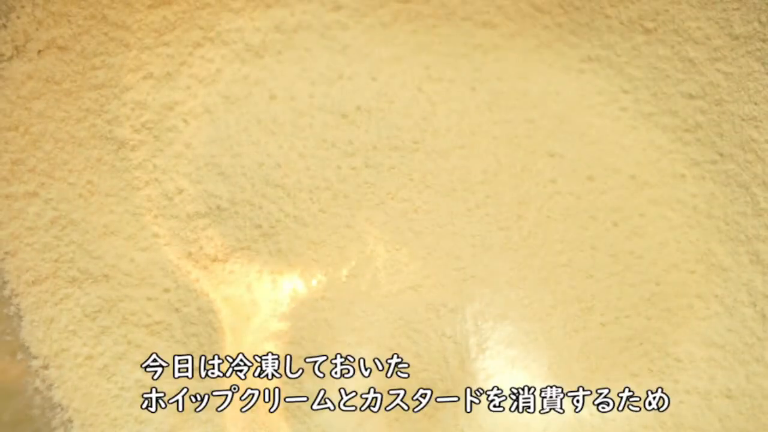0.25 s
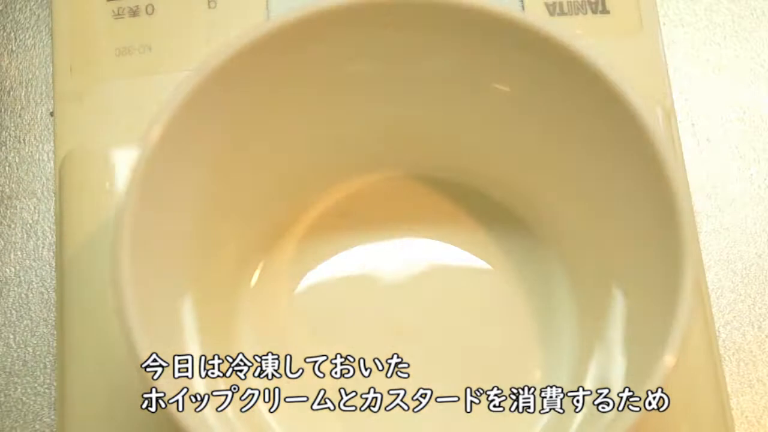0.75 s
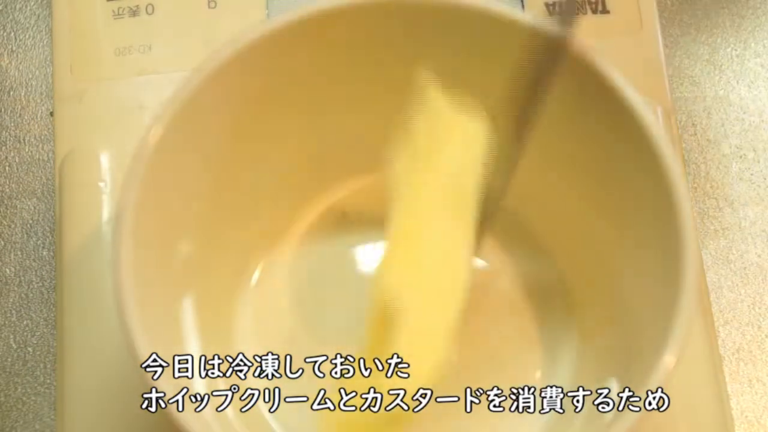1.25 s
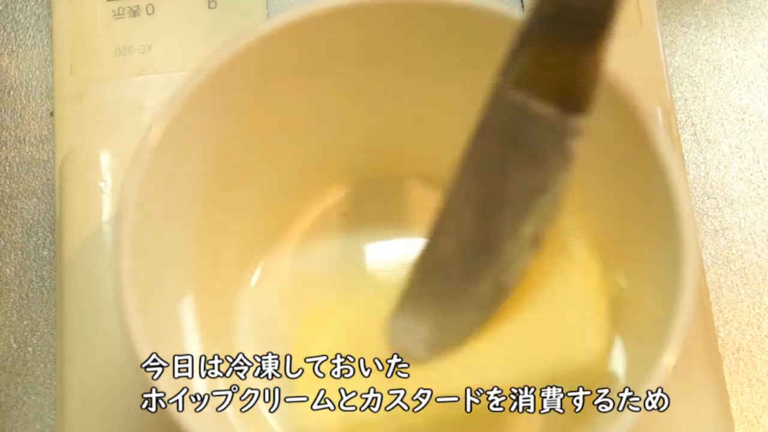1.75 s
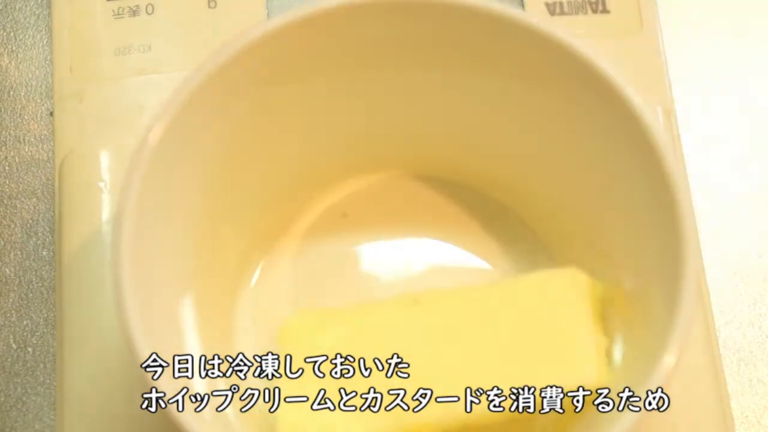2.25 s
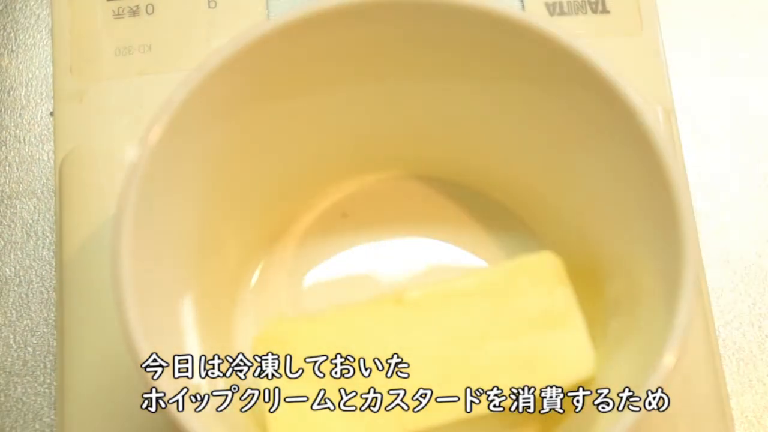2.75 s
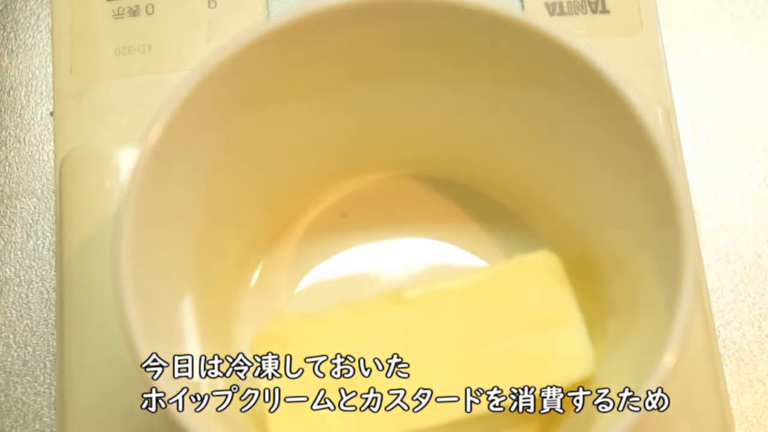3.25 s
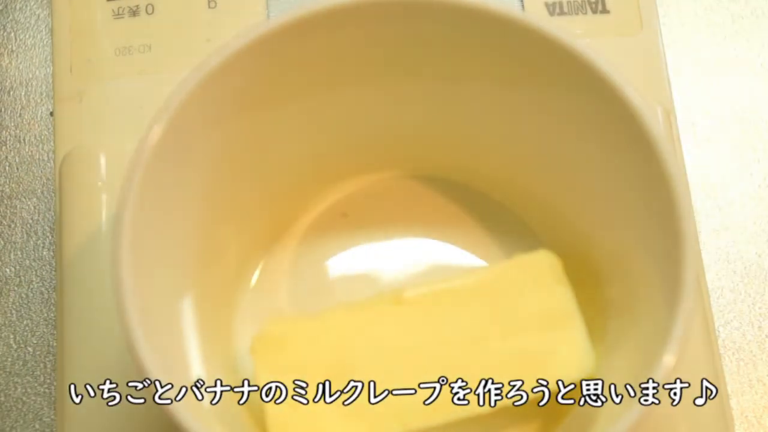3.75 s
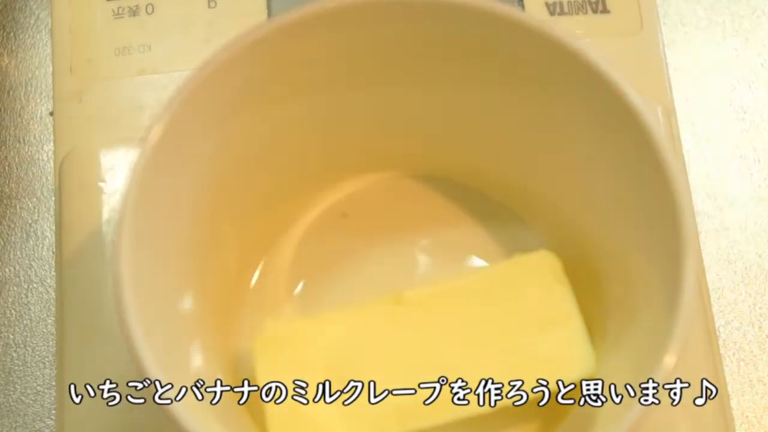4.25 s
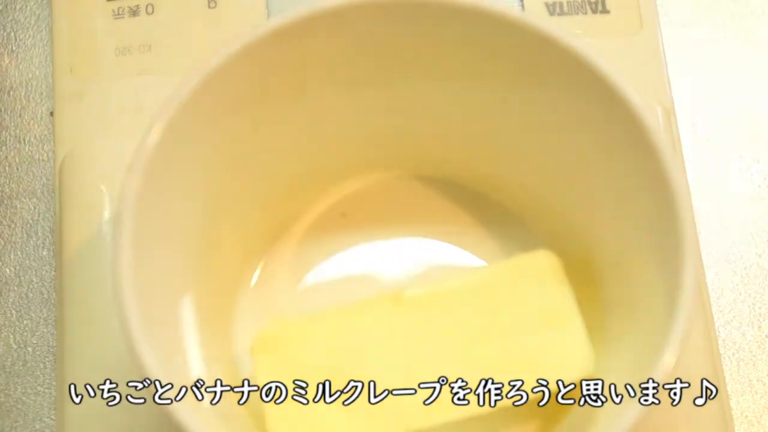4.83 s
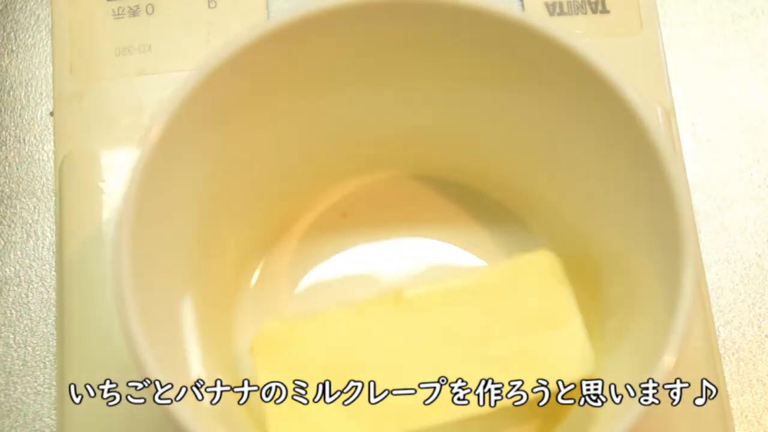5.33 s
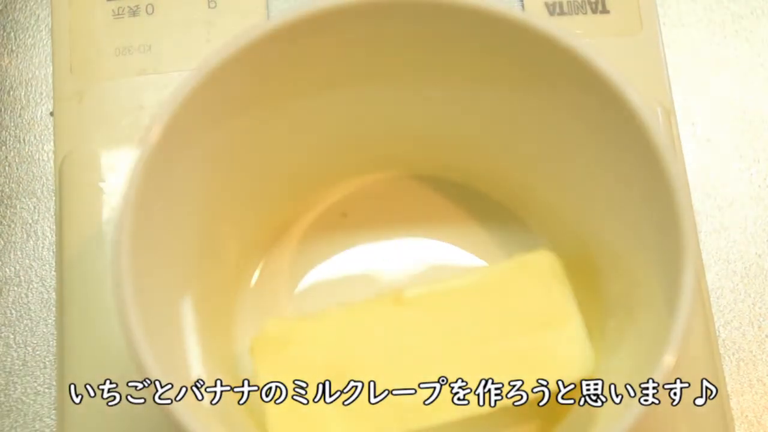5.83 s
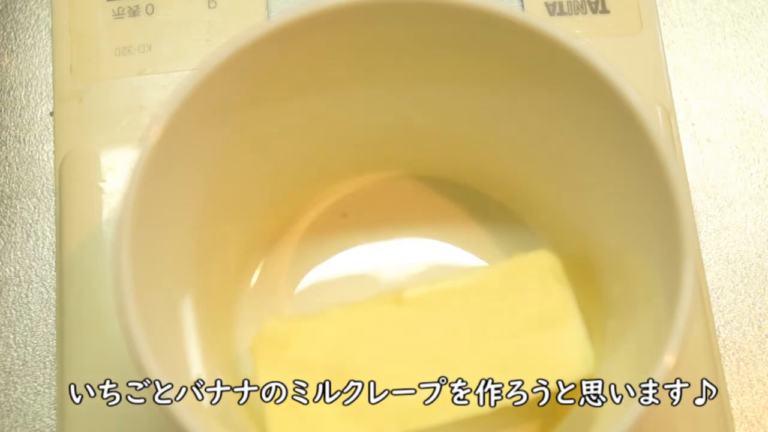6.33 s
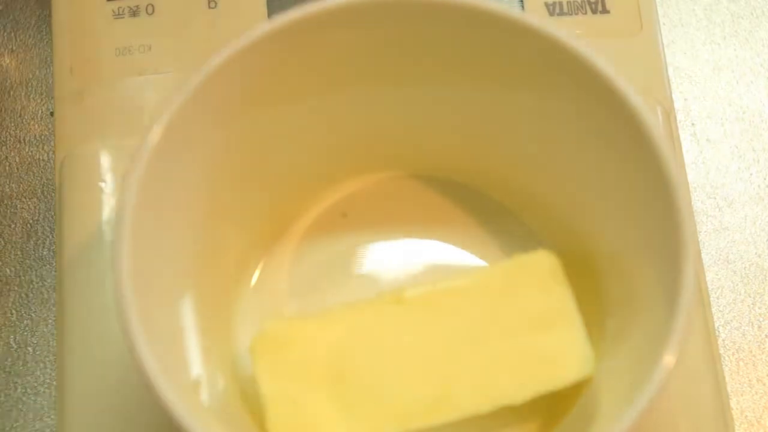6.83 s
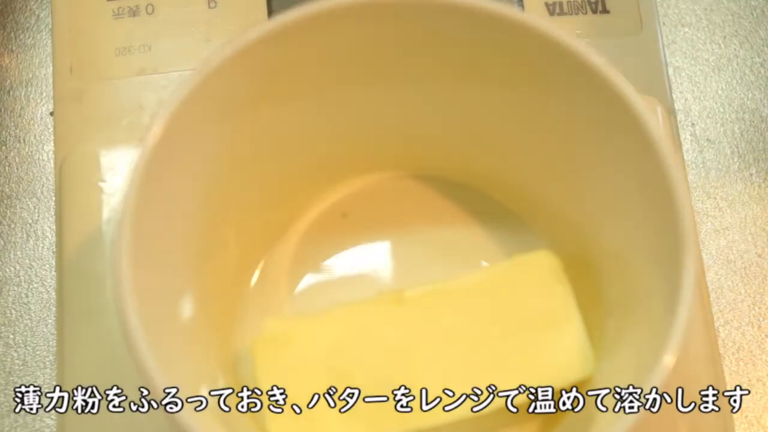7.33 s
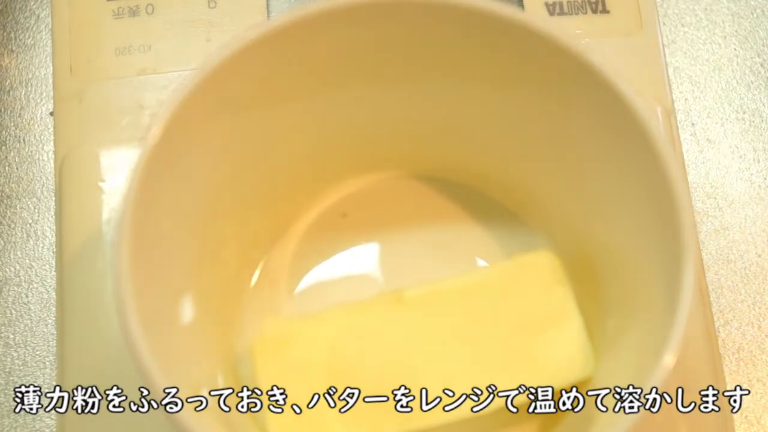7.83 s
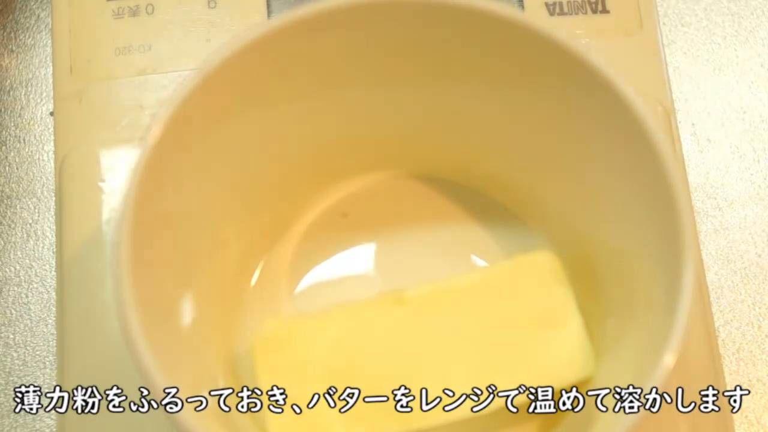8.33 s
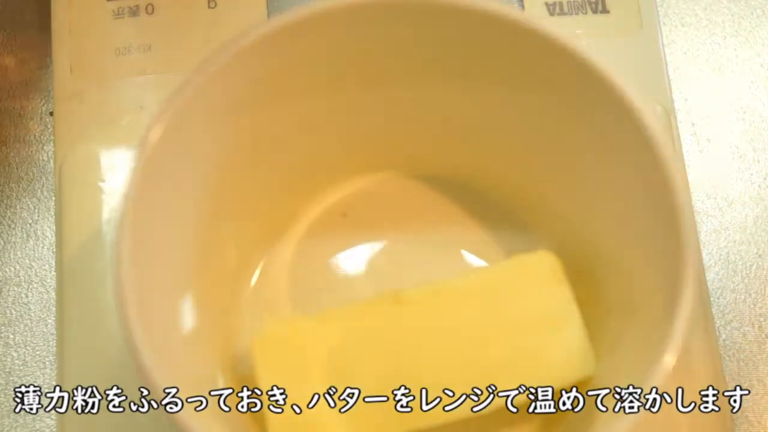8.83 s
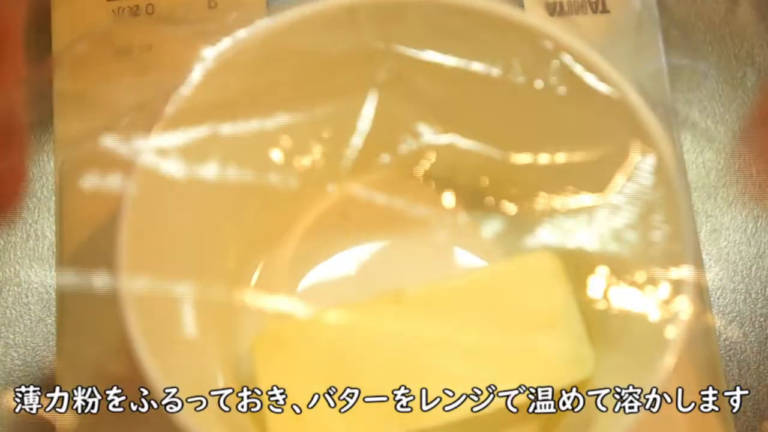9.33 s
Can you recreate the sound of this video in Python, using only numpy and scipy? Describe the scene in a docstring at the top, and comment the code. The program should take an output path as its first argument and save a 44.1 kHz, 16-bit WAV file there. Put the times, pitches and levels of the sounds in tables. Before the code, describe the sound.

Right at the start a dish slides briefly and lands with a ringing clatter, to the right of the close microphone. A soft dull knock follows at 0.6 seconds, and at about 1.3 seconds a steel knife clinks twice on a ceramic bowl. From about 2.5 seconds hands rummage softly, with cardboard rubbing and light knocks, and something hard is put down with a short ring at 3.3 seconds. From 6.2 seconds cling film is pulled from its box in crackling jerks, growing louder, with sharp snaps and low bumps on the worktop. Around 8 seconds it rips off in three quick tugs. The hollow cardboard box drops at 8.5 seconds, slightly right, and a few faint ticks of film follow until about 9.3 seconds. The small kitchen has a very short echo, and a faint appliance hum and hiss continue throughout.

```python
"""Cling film in a quiet kitchen

Close to the microphone, a dish slides and is set down, and a steel knife clinks on a ceramic bowl;
both ring in their own modes. Hands rummage for a cardboard box of cling film, pull the film out in
crackling jerks made of tiny slips, rip it off and drop the hollow box. The small room answers
briefly, and a faint appliance hums in the hiss behind."""
import sys
import numpy as np
from scipy import signal
from scipy.fft import rfft, irfft, next_fast_len
from scipy.io import wavfile
from scipy.ndimage import uniform_filter1d, map_coordinates

SR = 44100
rng = np.random.default_rng(int(sys.argv[2]) if len(sys.argv) > 2 else 0)


def unload_wav(signal):
    """Save mono or channel-first audio to the path in sys.argv[1] as 16-bit WAV at rate SR, clipped to [-1, 1]."""
    wavfile.write(
        sys.argv[1],
        SR,
        np.round(np.clip(np.atleast_2d(signal).T, -1, 1) * 32767).astype(np.int16),
    )


N = 422037

# where the hands are in front of the microphone: time_s, left_over_right_db
HAND_PAN = [(0, -12), (.5, -1.5), (6.6, -1.6), (7.1, -5), (8.6, -9), (9, -1)]
# resonances of the cardboard box: centre_hz, width_hz, level_db
BOX_RESONANCES = [(560, 55, 6), (1120, 55, 2), (1320, 80, 4), (1590, 60, 4), (2000, 60, 3)]
# the dull spectrum of rubbed card: frequency_hz, level_db
CARD_SPECTRUM = [(150, -23.5), (302, -13), (430, -16.5), (560, -4), (1120, -9), (1300, 2), (2800, 0),
                 (8000, -26), (17600, -120)]
FLEX = .07  # the grip bends the card and shifts its resonances by about this share


def amp(db):
    return 10 ** (np.asarray(db) / 20)


def unit(x):
    return x / np.sqrt(np.mean(x ** 2) + 1e-20)


def along(points, hz):
    """Reads (frequency_hz, value) points on a log axis."""
    f, v = np.transpose(points)
    return np.interp(np.log(hz + 1), np.log(f + 1), v)


def hand_pan():
    """Left over right in dB at every sample."""
    return np.interp(np.arange(N) / SR, *np.transpose(HAND_PAN))


def wobble(rate):
    """A smooth random curve, rate knots a second."""
    return map_coordinates(rng.standard_normal(int(N * rate / SR) + 4), [np.arange(N) * rate / SR])


def filtered(x, response):
    """x through a complex response of frequency."""
    n = x.shape[-1]
    m = next_fast_len(n + 8192)
    return irfft(rfft(x, m) * response(np.fft.rfftfreq(m, 1 / SR)), m)[..., :n]


def band(x, lo_hz, hi_hz):
    """A causal band-pass."""
    sos = signal.butter(2, [lo_hz, min(hi_hz, SR / 2.1)], "bandpass", fs=SR, output="sos")
    return signal.sosfilt(sos, x)


def spread(pair, spectrum, alike):
    """Two unrelated signals coloured and mixed to a stereo pair of rms 1."""
    turn = lambda hz: np.arccos(np.clip(along(alike, hz), -1, 1)) / 2
    colour = lambda hz: amp(along(spectrum, hz)) * [np.cos(turn(hz)), np.sin(turn(hz))]
    mid, side = filtered(pair, colour)
    return unit(np.array([mid + side, mid - side]))


def add(track, s, sound, pan_db):
    """Lays a sound into the stereo track at s seconds; positive pan is left."""
    part = track[:, round(s * SR):][:, :sound.shape[-1]]
    part += sound[..., :part.shape[1]] * amp([[pan_db / 2], [-pan_db / 2]])


def resonant(peaks):
    """The response of (centre_hz, width_hz, level_db) resonances."""
    return lambda f: sum((-1) ** k * amp(db) * 1j * f * width / (hz * hz - f * f + 1j * f * width)
                         for k, (hz, width, db) in enumerate(peaks))


def box_response(hz):
    """The cardboard box: its resonances over a flat response."""
    return .5 + resonant(BOX_RESONANCES)(hz)


def struck(blows, modes, clatter, clatter_t60, clatter_hz, attack_s, blur, pan_db):
    """Each blow rings the modes, whose phases wander as the object rocks, under a dying clatter."""
    track, t = np.zeros((2, N)), np.arange(SR // 3) / SR
    contact = (1 - np.exp(-t / attack_s)) * (1 + 0.73 * np.exp(-t / 0.0063))  # loudest while touching
    hz, mode_db, t60 = np.transpose(modes)[:, :, None]
    phase_step = np.sqrt(2 * np.pi * blur * hz / SR)
    for s, db in blows:
        wander = np.cumsum(rng.standard_normal((len(modes), len(t))), axis=1) * phase_step
        strength_db = mode_db + rng.normal(0, 1.5, mode_db.shape)
        ring = np.sum(amp(strength_db - 60 * t / t60) * np.sin(2 * np.pi * hz * t + wander), axis=0)
        noise = unit(band(band(rng.standard_normal(len(t)), 780, clatter_hz), 350, clatter_hz))
        rattle = clatter * amp(-60 * t / clatter_t60) * noise
        add(track, s, amp(db) * (ring + rattle) * contact, pan_db)
    return track


def slips(per_s, scatter_db, clump_db, smooth, patchy_db):
    """Friction: noise gated by many tiny slips of unequal size, arriving in clumps."""
    sizes = (rng.random(N) < per_s / SR) * amp(scatter_db * rng.uniform(-1, 1, N))
    gate = unit(signal.lfilter([1], [1, -np.exp(-1 / (.0004 * SR))], sizes))
    clumps = unit((gate + smooth) * amp(clump_db * wobble(35)))
    z = signal.stft(clumps * rng.standard_normal((2, N)), nperseg=256)[2]
    # each fold of film has its own colour: random gain patches in time and frequency
    patches = uniform_filter1d(uniform_filter1d(rng.standard_normal(z.shape[1:]), 5, 0), 6, 1)
    return signal.istft(z * amp(patchy_db * unit(patches)), nperseg=256)[1][:, :N]


def swells(strokes):
    """Body and crackle gains: each stroke swells to its loudest moment and dies; they add in power."""
    loudest_s, length_s, *levels = np.transpose(strokes)[:, :, None]
    t = np.arange(0, N + 64, 64) / SR
    rise_share, ends_db, roundness = 0.57, -12, 1.4
    away = np.where(t < loudest_s, (loudest_s - t) / rise_share, (t - loudest_s) / (1 - rise_share))
    shape_db = ends_db * (away / length_s) ** roundness
    gains = [np.linalg.norm(amp(db + shape_db), axis=0) for db in levels]
    return [np.interp(np.arange(N) / SR, t, gain) for gain in gains]


def flexing(grains, boxy):
    """The slips heard partly through the box, whose resonances drift as the hands bend it."""
    hz, t, z = signal.stft(grains, SR, nperseg=1024)
    grip = 1 + FLEX * np.interp(t, np.arange(N) / SR, wobble(2.9))
    colour = np.abs(1 + boxy * box_response(hz[:, None] * grip))
    return signal.istft(z * colour, SR, nperseg=1024)[1][:, :N]


def rubbing(grains, body_gain, crackle_gain, body_spectrum, boxy):
    """The same slips sound through a dull body, partly held in the box, and through the bright film."""
    # the film's crackle: frequency_hz, level_db
    film_spectrum = [(1800, -30), (3500, -3), (5000, 0), (9000, -3), (14500, -5), (16500, -15)]
    # how alike left and right are this close: frequency_hz, correlation
    alike = [(100, 0.58), (600, 1), (2500, 0.2), (12000, 1)]
    held = flexing(grains, boxy) if boxy else grains
    body = body_gain * spread(held, body_spectrum, alike)
    crackle = crackle_gain * spread(grains, film_spectrum, alike)
    pan_db = hand_pan()
    return (body + crackle) * amp([pan_db / 2, -pan_db / 2])


def room_hiss():
    """The steady noise of the room, all round the microphone."""
    # colour of the hiss: frequency_hz, level_db
    spectrum = [(25, -22), (123, -14.5), (414, -7), (572, 1), (1060, -1.5), (1870, -7.5), (6490, -8),
                (15800, -17.5)]
    # how alike left and right are: frequency_hz, correlation
    alike = [(60, 1), (380, 0.55), (2380, 0.02), (15000, 1)]
    return amp(-63.5) * spread(rng.standard_normal((2, N)), spectrum, alike)


def appliance():
    """Thin wavering tones over a low hum in which two near tones beat."""
    # the thin tones: pitch_hz, rms_db
    whine = [(516.8, -79), (1098, -80), (6702, -86.5)]
    hum_hz, swell_s, first_null_s = 129.2, 2.13, 0.61
    t = np.arange(N) / SR
    tones = sum(np.sqrt(2) * amp(db + 0.71 * wobble(1.1)) * np.sin(2 * np.pi * hz * t)
                for hz, db in whine)
    beat = np.sin(np.pi * (t - first_null_s) / swell_s)
    return tones + amp(-82) * beat * np.sin(2 * np.pi * hum_hz * t)


def dish():
    """A dish scrapes ever louder until it lands, rocks and rings, to the right of the microphone."""
    # the dish lands and rocks: start_s, level_db
    landings = [(.108, -17.5), (.122, -24), (.142, -27), (.18, -32)]
    # its ring: pitch_hz, level_db, t60_s
    modes = [(738, -6, 0.12), (791, -12, 0.13), (1550, -17, 0.17), (1990, -17, 0.06), (2490, -20, 0.09),
             (3210, -15, 0.17), (3930, -12, 0.09), (5240, -21, .2), (7280, -22, 0.25), (7740, -19, 0.16)]
    # its drone while sliding: centre_hz, width_hz, level_db
    drone = [(484, 65, -4), (655, 38, -0.5), (956, 54, -1), (3100, 34, -16.5)]
    swell_db_per_s, stop_t60_s = 53, 0.052
    t, landing_s = np.arange(N) / SR, landings[0][0]
    slide_db = -48 + swell_db_per_s * np.minimum(t, landing_s)
    slide_db -= 60 * np.maximum(t - landing_s, 0) / stop_t60_s
    scrape = amp(slide_db + 2.2 * wobble(73)) * unit(filtered(rng.standard_normal(N), resonant(drone)))
    ring = struck(landings, modes, clatter=0.15, clatter_t60=0.24, clatter_hz=10260,
                  attack_s=0.0017, blur=0.016, pan_db=-10)
    return scrape * amp([[-2.5], [2.5]]) + ring


def rummaging():
    """Hands and card slide in soft strokes, over a faint rustle of hands never quite still."""
    # the strokes: loudest_s, length_s, body_db, crackle_db
    strokes = [(.2, 0.43, -55, -87), (.845, 0.2, -63.5, -64), (1.14, 0.11, -60, -91),
               (2.83, 0.65, -59.5, -65), (3.03, 0.017, -59, -66.5), (3.148, 0.06, -65, -53.5),
               (3.23, 0.12, -59, -65), (3.31, 0.44, -65.5, -54.5), (3.76, 0.32, -60, -71),
               (4.135, 0.054, -50.5, -63), (4.215, 0.082, -50.5, -55), (4.29, 0.13, -52.5, -63),
               (4.45, 0.2, -51.5, -62), (4.72, 0.49, -57, -69), (4.83, 0.33, -55, -59.5),
               (4.95, 0.61, -61, -67), (5.2, 0.17, -61, -69), (5.51, 0.14, -51.5, -64),
               (6.05, 1, -61.5, -67), (8.172, 0.097, -54, -60), (8.275, 0.12, -60.5, -60),
               (8.39, 0.18, -57.5, -59), (8.57, 0.1, -58, -64.5)]
    grains = slips(per_s=800, scatter_db=5, clump_db=1.2, smooth=4, patchy_db=2.5)
    body, crackle = swells(strokes)
    return rubbing(grains, np.hypot(body, amp(-69)), crackle, CARD_SPECTRUM, boxy=.2)


def worktop_thumps():
    """Blows carry through the worktop as a short low ring with a soft start."""
    # the thumps: start_s, level_db, pitch_hz
    thumps = [(0.119, -49.5, 99), (0.125, -41, 183), (4.891, -58, 106), (6.95, -43.5, 257),
              (7.238, -42, 260), (7.59, -36, 359), (8.085, -36.5, 370)]
    track, t = np.zeros((2, N)), np.arange(SR // 3) / SR
    fade = amp(-60 * t / 0.13) * (1 - np.exp(-t / 0.0033))
    for s, db, hz in thumps:
        add(track, s, amp(db) * fade * np.sin(2 * np.pi * hz * t), pan_db=0)
    return track


def dull_knock():
    """A broad dull knock, cut off abruptly."""
    # the knock: start_s, level_db, length_s
    knocks = [(.643, -39, .0098)]
    track = np.zeros((2, N))
    for s, db, length_s in knocks:
        t = np.arange(round(length_s * SR)) / SR
        noise = unit(band(rng.standard_normal(SR // 10), 250, 1900))[:len(t)]
        gate = (1 - np.exp(-t / 0.0029)) * (1 - np.exp((t - length_s) / 0.00043))
        add(track, s, amp(db) * noise * gate, pan_db=-1)
    return track


def knife_on_bowl():
    """Steel meets ceramic, twice and once more faintly, and both ring."""
    # the contacts: start_s, level_db
    clinks = [(1.2256, -23), (1.3069, -20), (1.3458, -32)]
    # ring of knife and bowl: pitch_hz, level_db, t60_s
    modes = [(793, -17, .07), (858, -9, .09), (1530, -13, .06), (2105, -11, .08), (2240, -15, .12),
             (3050, -15, .07), (3750, -19, .065), (5190, -15, .24), (9095, 1, .055), (9204, -7, .09),
             (14010, -18, .09)]
    ring = struck(clinks, modes, clatter=0.26, clatter_t60=0.065, clatter_hz=8000,
                  attack_s=0.001, blur=0.004, pan_db=-2.5)
    return band(ring, 890, 20000)


def film_snaps():
    """A fold of film lets go: a broad click of a few milliseconds over a short pitched body."""
    # the snaps: start_s, click_db, body_over_click_db, body_hz
    snaps = [(3.238, -28, 0, 6860), (4.832, -37.5, 1, 3980), (6.7891, -21, 4.5, 2950),
             (6.9062, -19.5, -18, 2400), (6.924, -16, -12, 4360), (6.98, -18.5, -7, 2900),
             (7.104, -25.5, 1.5, 3640), (7.2308, -24.5, 3, 3300), (7.343, -24.5, -0.5, 3400),
             (7.4887, -22, -8.5, 3820), (7.5087, -26, -6.5, 1620), (7.538, -23, -3.5, 1900),
             (7.598, -24.5, -4, 1480), (7.6254, -25.5, -8, 3980), (7.637, -24, -14, 2510),
             (7.6608, -21, -9, 3920), (7.6798, -21.5, -30, 4050), (7.7177, -18, -35, 1610),
             (7.742, -23.5, -8.5, 1440), (7.7871, -26.5, -26, 3070), (7.8065, -16, -35, 3060),
             (7.861, -33, -22, 4000), (7.912, -19.5, -6, 4770), (8.869, -41.5, -30, 3750),
             (9.1266, -43, -33, 3030), (9.3218, -40.5, -3, 2170)]
    track, t = np.zeros((2, N)), np.arange(SR // 10) / SR
    pan_db = hand_pan()
    unit_peak = lambda x: x / np.abs(x).max()
    rise = 1 - np.exp(-t / 0.00017)
    spike = 1 + 1.5 * np.exp(-t / .0015)
    for s, db, body_db, hz in snaps:
        wide_noise = rng.standard_normal(len(t)) + 0.64 * rng.standard_normal((2, len(t)))
        click = unit_peak(rise * spike * amp(-60 * t / 0.035) * band(wide_noise, 2300, 13500))
        pitched_noise = band(rng.standard_normal(len(t)), hz / 1.2, hz * 1.2)
        body = unit_peak(rise * amp(-60 * t / 0.028) * pitched_noise)
        add(track, s, amp(db) * (click + amp(body_db) * body), pan_db[round(s * SR)])
    return track


def box_knocks():
    """A dying rattle excites the box, gripped anew each time; the thud lasts longest, the edge least."""
    # knocks of box and drawer: start_s, level_db, thud_db, edge_db, t60_s, body_hz, thud_hz
    knocks = [(3.3383, -31.5, -9, -13.5, 0.22, 2200, 700), (3.493, -36, -1.5, -23, 0.11, 1300, 647),
              (4.119, -48, -28, -22, 0.16, 1870, 720), (5.504, -46.5, -9, -15, 0.08, 1330, 540),
              (5.583, -50.5, -6, -17, 0.48, 1670, 593), (5.683, -39, 2.5, -17.5, 0.14, 1580, 580),
              (5.9465, -40.5, -4.5, -19, 0.12, 1800, 586), (6.299, -40.5, -20, -18, 0.087, 1340, 563),
              (6.79, -27, -12, -17, 0.031, 1900, 600), (6.9531, -22.5, -12.5, -13, 0.034, 1600, 633),
              (7.232, -27, -7.5, -17, 0.051, 1530, 530), (7.5294, -31.5, -7, -3.5, 0.06, 1900, 574),
              (7.591, -36.5, -6.5, 0.5, 0.11, 1830, 530), (8.458, -22, -7, -10, 0.062, 1570, 534),
              (8.601, -48.5, -5, -21, 0.052, 2180, 420)]
    track, t = np.zeros((2, N)), np.arange(SR // 3) / SR
    pan_db = hand_pan()
    noise = lambda: rng.standard_normal(len(t))
    for s, db, thud_db, edge_db, t60, body_hz, thud_hz in knocks:
        hardness = min(amp(edge_db) * 4, 1)  # bright blows start fast and crack
        rise = 1 - np.exp(-t / (0.00075 + 0.00051 * (1 - hardness)))
        crack = 1 + 2.5 * hardness * np.exp(-t / 0.002)
        grip = 1 + FLEX * rng.uniform(-1.6, 1)
        rattle = unit(filtered(noise(), lambda hz: box_response(hz * grip)))
        thud = amp(thud_db - 60 * t / (1.27 * t60)) * unit(band(noise(), thud_hz / 1.19, thud_hz * 1.3))
        body = amp(-60 * t / t60) * unit(band(rattle, body_hz / 1.6, body_hz * 1.86))
        edge = amp(edge_db - 60 * t / (0.5 * t60)) * unit(band(band(noise(), 4200, 10300), 3100, 15000))
        add(track, s, amp(db) * (thud + crack * (body + edge)) * rise, pan_db[round(s * SR)])
    return track


def set_aside():
    """Something hard is put down a little to the left and rings."""
    # the contact: start_s, level_db
    blows = [(3.3385, -30)]
    # its ring: pitch_hz, level_db, t60_s
    modes = [(945, -8, 0.13), (1610, -4, 0.088), (2100, -14, 0.4), (2290, -1, 0.13), (2780, -1, 0.061),
             (4813, -14, 0.15), (9448, -18, .17)]
    return struck(blows, modes, clatter=0.25, clatter_t60=.09, clatter_hz=13000,
                  attack_s=.001, blur=0.0051, pan_db=4)


def film_pull():
    """The film leaves the roll in crackling jerks that sound through the box."""
    # the jerks: loudest_s, length_s, body_db, crackle_db
    jerks = [(6.235, 0.093, -48, -53.5), (6.32, 0.069, -44, -47.5), (6.41, 0.22, -53, -51.5),
             (6.49, 0.12, -43, -50.5), (6.6, 0.083, -47.5, -58), (6.68, 0.1, -53, -54),
             (6.82, 0.16, -46.5, -48.5), (6.885, 0.043, -38.5, -37.5), (6.965, 0.12, -36, -65),
             (7.11, 0.31, -40.5, -37), (7.225, 0.11, -40, -41), (7.32, 0.049, -43, -49),
             (7.405, 0.11, -44, -48.5), (7.49, 0.048, -38.5, -48.5), (7.56, 0.14, -45.5, -51),
             (7.7, 0.31, -47.5, -61), (7.85, 0.12, -53.5, -59)]
    grains = slips(per_s=400, scatter_db=6, clump_db=1.3, smooth=3, patchy_db=3.5)
    return rubbing(grains, *swells(jerks), CARD_SPECTRUM, boxy=.45)


def film_rip():
    """The taut film rips along the cutter in three tugs, each singing in a narrow band."""
    # the tugs: start_s, length_s, body_db, crackle_db, singing_db, singing_hz
    tugs = [(7.911, 0.039, -32.5, -29, -43, 3040), (7.964, 0.094, -34, -32, -43, 1430),
            (8.066, 0.03, -32.5, -32.5, -38.5, 3280)]
    # body of the taut film: frequency_hz, level_db
    taut_spectrum = [(150, -28), (560, -9.5), (1150, -7), (1480, 0), (1850, -3), (3200, -4), (6000, -21)]
    attack_s, release_t60_s, band_ratio = 0.0026, 0.061, 1.09
    start_s, length_s, body_db, crackle_db, singing_db, singing_hz = np.transpose(tugs)[:, :, None]
    grains = slips(per_s=1000, scatter_db=7.5, clump_db=.8, smooth=1.4, patchy_db=1.8)
    t = np.arange(N) / SR - start_s
    shape = np.clip(t / attack_s, 0, 1) * amp(-60 * np.maximum(t - length_s, 0) / release_t60_s)
    body, crackle = [np.linalg.norm(amp(db) * shape, axis=0) for db in (body_db, crackle_db)]
    notes = [unit(band(grains[0], hz / band_ratio, hz * band_ratio)) for hz, in singing_hz]
    singing = np.sum(amp(singing_db) * shape * notes, axis=0) * amp([[3], [-3]])
    return rubbing(grains, body, crackle, taut_spectrum, boxy=0) + singing


def box_drop():
    """The box lands flat and rings hollow in its own resonances, the lowest most."""
    # the landing: start_s, level_db
    blows = [(8.4585, -23)]
    lowest_hz, _, lowest_db = BOX_RESONANCES[0]
    modes = [(hz, db - 20 * np.log10(hz / lowest_hz) - lowest_db, np.log(1000) / (np.pi * width))
             for hz, width, db in BOX_RESONANCES]
    return struck(blows, modes, clatter=0.037, clatter_t60=0.057, clatter_hz=5000,
                  attack_s=0.00044, blur=0.0035, pan_db=-4.5)


def kitchen_reverb(x):
    """Each frequency of the room's answer dies at its own speed; the bass is alike on both sides."""
    # decay of the room: frequency_hz, t60_s
    decay = [(200, 0.19), (2000, 0.2), (12000, 0.14)]
    hz, t, z = signal.stft(rng.standard_normal((2, SR // 2)), SR, nperseg=256)
    shared = 1 / (1 + (hz[:, None] / 900) ** 2)
    z = np.array([z[0], np.sqrt(shared) * z[0] + np.sqrt(1 - shared) * z[1]])
    tail = signal.istft(z * amp(-60 * t / along(decay, hz)[:, None]), SR, nperseg=256)[1]
    delayed = np.pad(x.mean(0), (130, 0))[None]  # about 3 ms
    return signal.fftconvolve(delayed, tail / np.linalg.norm(tail[0]), axes=1)[:, :N]


def scene():
    """Everything the hands do, close up, with the kitchen behind."""
    hits = dish() + knife_on_bowl() + set_aside() + box_drop() + box_knocks()
    rustle = rummaging() + film_pull() + film_rip() + film_snaps()
    room = kitchen_reverb(amp(-4.0) * hits + amp(-7.5) * rustle)
    handling = band(hits + rustle + room, 115, 22000)  # small objects radiate little bass
    return handling + dull_knock() + worktop_thumps() + appliance() + room_hiss()


def record(dry):
    """The camera's microphone channel keeps nothing above its band limit."""
    return filtered(dry, lambda hz: hz < 15900)


dry = scene()
out = record(dry)
unload_wav(out)
```